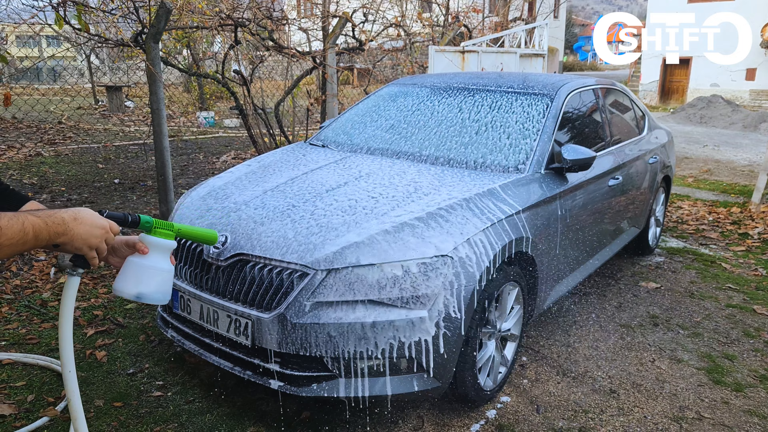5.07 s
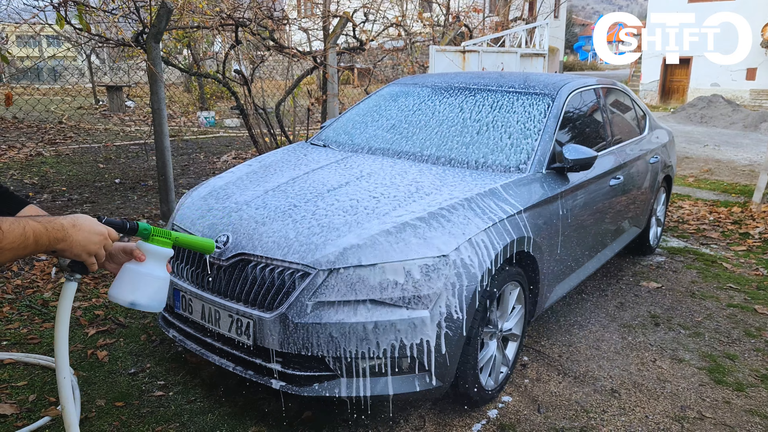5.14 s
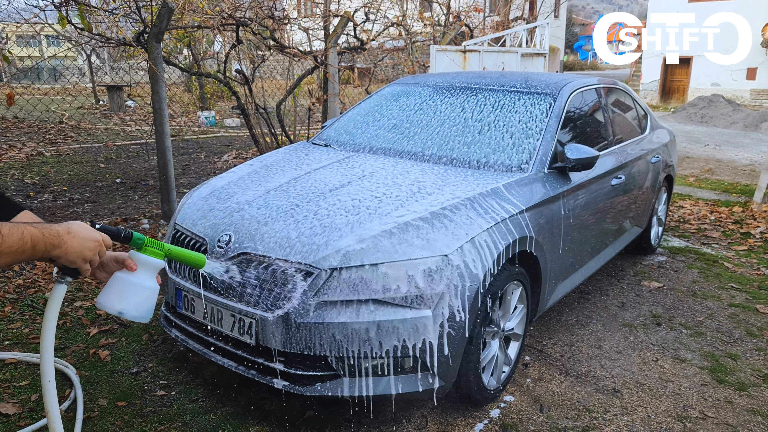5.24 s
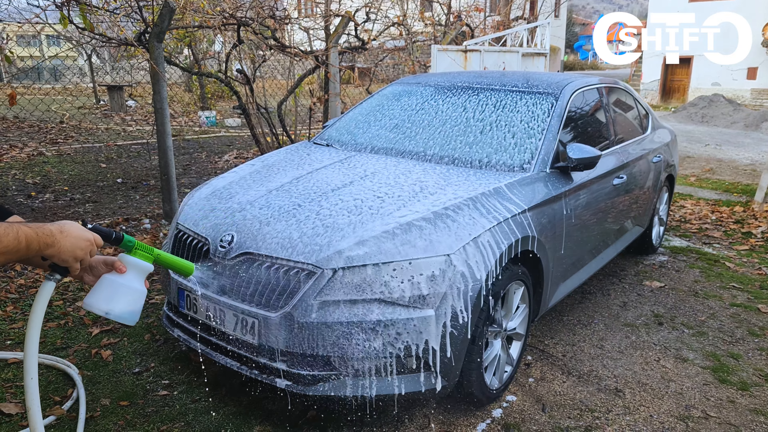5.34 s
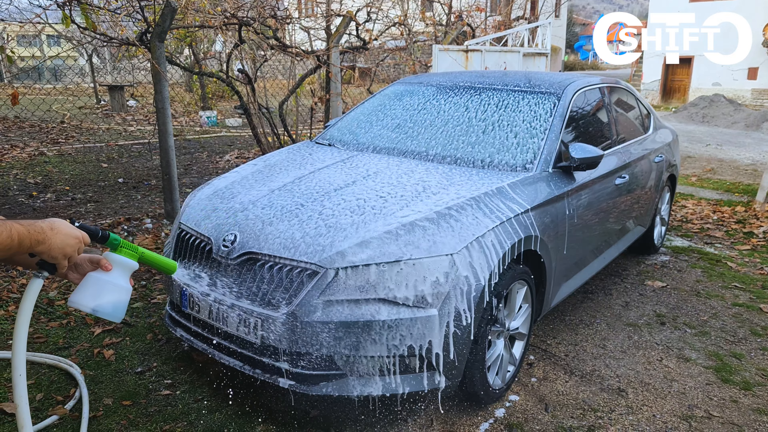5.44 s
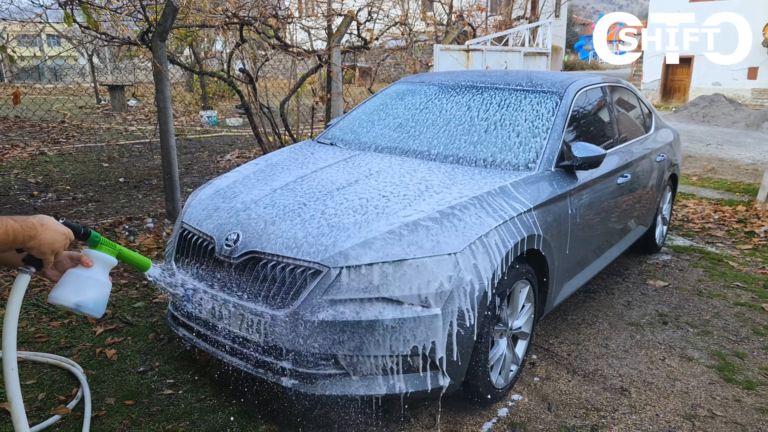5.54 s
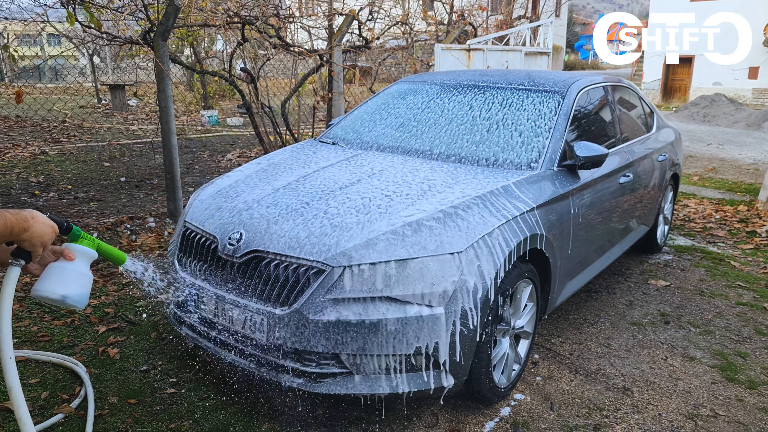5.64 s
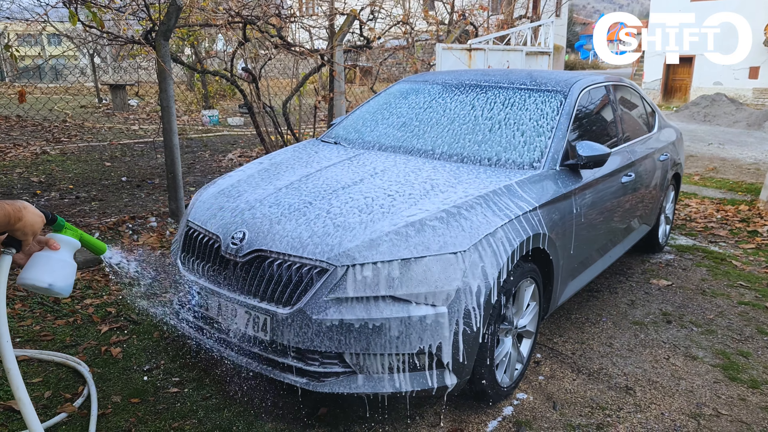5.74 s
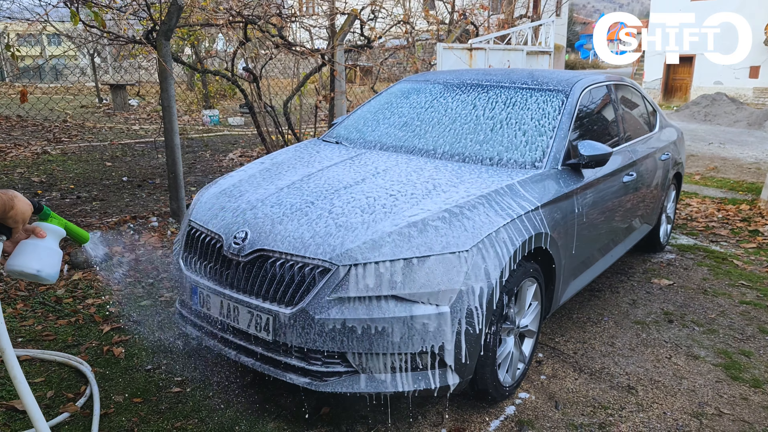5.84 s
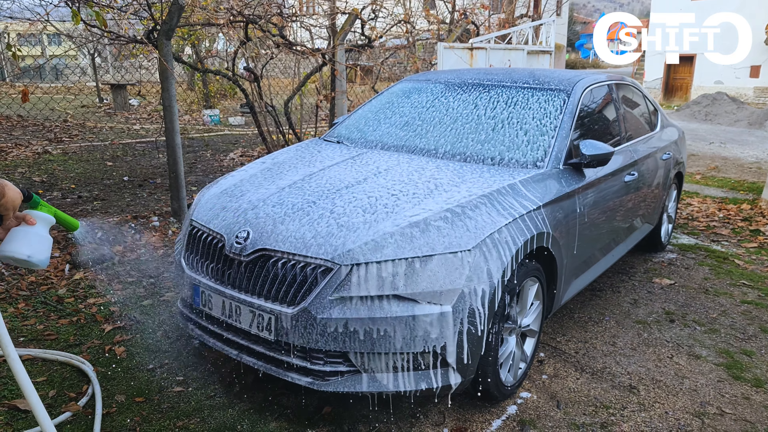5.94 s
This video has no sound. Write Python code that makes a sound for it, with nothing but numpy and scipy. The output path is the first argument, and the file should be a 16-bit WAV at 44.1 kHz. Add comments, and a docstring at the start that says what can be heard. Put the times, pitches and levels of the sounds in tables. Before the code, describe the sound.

Close, steady foam spray starts and stops against a car body outdoors, with faint drips and light wind in the short pauses.

```python
"""The jet of a hose-fed foam gun, band-shaped noise, sprays a car in four bursts close to a stereo microphone.
Resonances ring in the barrel, foam drums on the panels and fizzes; car, fence and walls return echoes.
When the valve shuts, foam in flight patters down as fading noise, and runoff and drops tick as short impulses.
A wandering near-sine whistles faintly; shaped noise makes the light wind and the quiet yard."""
import sys
import numpy as np
from scipy import signal
from scipy.fft import rfft, irfft
from scipy.io import wavfile
from scipy.ndimage import uniform_filter1d

SR = 44100
rng = np.random.default_rng(int(sys.argv[2]) if len(sys.argv) > 2 else 0)


def put_to_file(sound):
    """Save the sound as 16-bit audio at rate SR, in the file named by the first command-line argument."""
    columns = np.atleast_2d(sound).T  # one column per channel
    safe = np.clip(columns, -1, 1)
    whole_steps = np.round(safe * 32767)
    wavfile.write(sys.argv[1], SR, whole_steps.astype(np.int16))


def makeup_ratio(level_db):
    """Linear amplitude ratio for a level in decibels (20 dB per factor of ten)."""
    decades = np.asarray(level_db, float) / 20
    return 10 ** decades


N = 264592  # samples


def evened(x):
    """Normalization: scales to rms 1."""
    return x / np.sqrt(np.mean(x ** 2) + 1e-20)


def banded(x, lo_hz, hi_hz):
    """Parseval's theorem: scales so that the band lo-hi has rms 1."""
    hz = np.fft.rfftfreq(len(x), 1 / SR)
    band_energy = np.sum(abs(rfft(x)[(hz > lo_hz) & (hz < hi_hz)]) ** 2)
    return x * len(x) / np.sqrt(2 * band_energy)


def add(mix, s, sound):
    """Superposition: mixes a sound in at second s."""
    part = mix[round(s * SR):][:len(sound)]
    part += sound[:len(part)]


def read(points, hz):
    """Interpolation of a spectrum on a logarithmic frequency axis."""
    f, value = np.transpose(points)
    return np.interp(np.log(hz + 1), np.log(f + 1), value)


def columns(rows):
    """Linear interpolation: gives the start time and every column at the sample rate."""
    s, *rest = np.transpose(rows)
    t = np.arange(round(s[0] * SR), min(round(s[-1] * SR), N)) / SR
    return s[0], [np.interp(t, s, c) for c in rest]


def hiss(colour, size, patchy_db, flicker_db):
    """Short-time synthesis: random spectra with narrow streaks, wider patches and a fast broadband flicker."""
    hop, hz = size // 4, np.fft.rfftfreq(size, 1 / SR)
    real, imag, streaks, patches, flicker = rng.standard_normal((N // hop + 5, len(hz), 5)).T

    def smoothed(z, bins, frames):
        return evened(uniform_filter1d(uniform_filter1d(z, size=bins, axis=0), size=frames, axis=1))

    streaks = smoothed(streaks, bins=2, frames=44)
    patches = smoothed(patches, bins=12, frames=16)
    flicker = smoothed(flicker, bins=80, frames=3)
    shape_db = read(colour, hz)[:, None] + patchy_db * (streaks + 0.6 * patches) + flicker_db * flicker
    spectra = (real + 1j * imag) * makeup_ratio(shape_db)
    return evened(signal.istft(spectra, nperseg=size, noverlap=size - hop)[1][:N])


def ring(x, hz, width_hz):
    """Heterodyne resonator: shifts the curve hz to zero, smooths with a double pole, shifts back; rms 1."""
    turn = np.exp(2j * np.pi * np.cumsum(hz * np.ones(len(x))) / SR)
    r = np.exp(-np.pi * width_hz / SR)
    smooth = signal.lfilter([1], [1, -2 * r, r ** 2], x / turn)
    return evened((turn * smooth).real)


def whistly(x, hz, width_hz):
    """Superposed resonances: a narrow core stands on wide shoulders."""
    return evened(ring(x, hz, width_hz) + 0.23 * ring(x, hz, 0.23 * width_hz))


def splats(per_s, spread_db):
    """Shot noise: blobs at random instants each raise a gain suddenly, then fade."""
    size_db = abs(spread_db) * np.minimum(rng.exponential(1, N), 4)
    hits = (rng.random(N) < per_s / SR) * makeup_ratio(size_db)
    fade = np.exp(-1 / (0.00079 * SR))  # of the power
    return evened(np.sqrt(signal.lfilter([1], [1, -fade], hits ** 2) + 2.7))


def waver(span_s, count):
    """Low-pass filtered chance: slow curves at rms 1, changing within about span_s."""
    hop = 64
    poles = [np.exp(-hop / (span_s * SR))] * 2
    z = signal.lfilter([1], np.poly(poles), rng.standard_normal((count, N // hop + 200)))[:, 199:]
    return [np.interp(np.arange(N) / hop, np.arange(len(row)), evened(row)) for row in z]


# squeezes of the trigger: valve opens t/s, valve shuts t/s, pressure build-up t/s,
# fizz re jet level/dB, finest mist re fizz level/dB
BURSTS = [(-.5, 0.339, .06, -4, -4), (.846, 2.299, 0.042, -4.5, 0), (3.168, 4.97, 0.064, -4.5, 0),
          (5.31, 6.5, 0.032, -6, -0.5)]
# the gun sweeps across the car: t/s, jet level/dB, low barrel ring re jet level/dB, its pitch f/Hz,
# high barrel ring re jet level/dB, drumming on the panel re jet level/dB
SWEEP = [(0, -38.5, -5, 966, 0, -12.5), (.18, -39.5, -4.5, 908, 0.5, -11), (.26, -40.5, 2, 864, 2.5, -14),
         (.34, -41.5, -2.5, 937, -0.5, -5), (.85, -40, -16.5, 990, -6.5, -15),
         (.93, -38, -6, 972, -3.5, -15.5), (1.03, -38, -2, 976, -9.5, -15),
         (1.25, -39, -2.5, 970, -17, -17), (1.4, -37.5, -3.5, 925, -8.5, -18),
         (1.51, -38, -0.5, 990, 0.5, -12.5), (1.62, -38.5, -5.5, 980, -5, -13),
         (1.86, -42, 3, 1012, -4, -20), (1.98, -40.5, 2.5, 987, -6.5, -18),
         (2.14, -38.5, -1, 915, -17, -16.5), (2.24, -37.5, -5, 920, -9.5, -18),
         (2.3, -40, 4.5, 920, -5, -12), (3.17, -37.5, -1.5, 1064, -12, -22),
         (3.27, -37.5, -9.5, 950, -3, -24), (3.42, -37, -7, 920, -2.5, -13.5), (3.5, -41, 2, 1050, -8, -19),
         (3.64, -40.5, 2, 1012, -12, -27), (3.79, -38, -3.5, 990, -2.5, -17.5),
         (3.97, -35.5, -7, 928, -5.5, -15), (4.15, -35.5, -6.5, 932, -4, -8), (4.35, -36, -10, 941, 0, -12),
         (4.5, -38.5, 0, 1020, 1, -11.5), (4.7, -36.5, -6.5, 970, -7, -9.5),
         (4.82, -37, 2.5, 977, -10.5, -11.5), (4.97, -40, 0.5, 943, -7, -11),
         (5.31, -37, 1.5, 942, -12, -18.5), (5.45, -37.5, -1, 952, -4.5, -16),
         (5.56, -36, -4, 918, -11, -13), (5.69, -36, -6, 935, -2, -22), (5.8, -37, -12.5, 952, -7, -14),
         (6, -42.5, 2.5, 1020, -5, -24)]
# pitch of the high barrel ring: t/s, f/Hz
HIGH_RING = [(0, 2320), (.32, 2410), (.9, 2396), (1.5, 2300), (1.9, 2380), (3.2, 2410), (3.42, 2304),
             (3.8, 2356), (4.34, 2240), (4.5, 2317), (4.9, 2375), (5.7, 2280), (6, 2370)]
# noise spectrum of the jet: f/Hz, level per Hz/dB
JET = [(60, -47.5), (150, -17), (400, -18.5), (650, -5), (790, 0), (1150, -2), (1300, -4.5), (1900, -4),
       (2700, -3), (3200, -1), (4300, -1), (5000, -7.5), (5700, -9.5), (6600, -23.5), (8000, -14),
       (11000, -51)]
# noise spectrum of the fizz: f/Hz, level per Hz/dB
FIZZ = [(3500, -56), (5500, -7), (6800, -8), (7600, -2.5), (8800, -4.5), (10000, -8), (12500, -13),
        (15700, -17.5)]
# resonances of the panel: f/Hz, width f/Hz, level/dB
PANEL = [(177, 40, -6), (271, 52, 6.5), (408.5, 102, 3.5), (494, 230, 11)]


def spray():
    """Source-filter principle: turbulence drives barrel and panel resonances, all gated by the valve."""
    open_s, shut_s = 0.007, 0.006  # travel of the valve
    slack_db = -9  # level at opening, until pressure has built
    lead_in_s, lead_in_db = 0.028, -29.5  # soft noise lead-in before each burst, re jet
    mist_hz, mist_s = 10560, 0.088  # the finest mist, above this pitch, forms as pressure builds
    mid_ring_db, mid_follows = -5.5, 1.02  # the middle ring rises and falls with the low ring
    ring_waver_db, low_waver_db, pitch_waver_hz = 1.8, 1.0, 14
    jet_waver_db, fizz_waver_db = 0.65, 1

    t = np.arange(N) / SR
    grain = splats(per_s=900, spread_db=3.0)
    jet = banded(hiss(JET, size=1024, patchy_db=2.2, flicker_db=0.8) * grain, 2700, 4800)
    fizz = banded(hiss(FIZZ, size=256, patchy_db=1.1, flicker_db=1.1) * grain, 7000, 15000)
    mist = signal.sosfiltfilt(signal.butter(3, mist_hz, "high", fs=SR, output="sos"), fizz)

    s, *rest = np.transpose(SWEEP)
    jet_db, low_db, low_hz, high_db, panel_db = (np.interp(t, s, c) for c in rest)
    (high_hz_waver, high_waver, low_waver, low_hz_waver,
     mid_waver, panel_waver, fizz_waver, jet_waver) = waver(0.03, count=8)
    churn, blows = rng.standard_normal((2, N))  # drive the barrel and the panel

    low_hz = low_hz + pitch_waver_hz * low_hz_waver
    low = makeup_ratio(low_db + low_waver_db * low_waver) * whistly(churn, low_hz, 138)
    mid_db = mid_ring_db + mid_follows * low_db + ring_waver_db * mid_waver
    barrel = makeup_ratio(mid_db) * whistly(churn, 1413, 560)
    high_hz = np.interp(t, *np.transpose(HIGH_RING)) + pitch_waver_hz * high_hz_waver
    high_db = high_db + ring_waver_db * high_waver
    barrel += makeup_ratio(high_db) * whistly(churn, high_hz, 310)
    barrel += makeup_ratio(high_db - 10) * whistly(churn, 3236, 180)  # top ring, along with the high ring

    modes = sum(makeup_ratio(db) * ring(blows, hz, width_hz) for hz, width_hz, db in PANEL)
    panel = makeup_ratio(panel_db + ring_waver_db * panel_waver) * evened(modes)
    jet_wavering = makeup_ratio(jet_waver_db * jet_waver) * jet

    out = np.zeros(N)
    for opens, shuts, build_s, fizz_db, mist_db in BURSTS:
        since = t - opens
        valve = np.clip(since / open_s, 0, 1) ** 2 * np.clip((shuts - t) / shut_s, 0, 1)
        pressure = makeup_ratio(slack_db * np.clip(1 - since / build_s, 0, 1))
        lead_in = makeup_ratio(lead_in_db) * np.clip(1 + since / lead_in_s, 0, 1) * (since < open_s)
        unformed = np.clip(1 - since / mist_s, 0, 1) ** 0.5
        droplets = fizz - mist + makeup_ratio(mist_db) * (1 - unformed) * mist
        fizzing = makeup_ratio(fizz_db + fizz_waver_db * fizz_waver) * droplets
        driven = pressure * (jet_wavering + fizzing + barrel + panel)
        driven += pressure ** 0.47 * low  # the low ring depends less on pressure
        out += valve * driven + lead_in * jet
    return makeup_ratio(jet_db) * out


# reverberation time of the surroundings: f/Hz, t60 t/s
ECHO = [(200, 0.34), (900, 0.4), (1600, .38), (3000, 0.21), (8000, .1)]


def echoes(x):
    """Reverberation by convolution: car, fence and house walls return the spray, the treble dying first."""
    hz, s, z = signal.stft(rng.standard_normal(SR // 2), SR, nperseg=256)
    decay = makeup_ratio(-60 * s / read(ECHO, hz)[:, None])
    tail = signal.istft(z * decay, SR, nperseg=256)[1]
    return makeup_ratio(-24.5) * signal.oaconvolve(x, tail / np.linalg.norm(tail))[:N]


# level of the wind: t/s, level/dB
WIND = [(0, -56), (.25, -60), (.35, -72), (.43, -59.5), (.53, -63), (.61, -56.5), (.67, -71), (.83, -64.5),
        (.95, -57.5), (1.25, -57.5), (1.4, -63), (1.62, -57), (2, -61), (2.35, -60.5), (2.47, -71),
        (2.64, -76.5), (2.71, -65), (2.82, -80), (2.9, -69), (3.06, -68), (3.13, -84), (3.33, -63),
        (3.5, -63), (3.7, -59), (3.9, -63), (4.12, -67), (4.3, -59), (4.9, -63), (5.2, -71), (5.6, -63),
        (6, -65)]
# noise spectrum of the wind: f/Hz, level per Hz/dB
WIND_COLOUR = [(20, -24.5), (34, -5), (47, 7.5), (62, -6), (80, -5.5), (120, -7), (160, -10.5),
               (260, -17.5), (330, -40), (600, -87)]


def wind():
    """Amplitude-modulated low noise: the wind rumbles in lumps on the microphone."""
    s, level_db = np.transpose(WIND)
    gusts = banded(hiss(WIND_COLOUR, size=4096, patchy_db=0.5, flicker_db=0.5), 30, 140)
    lumps_db = 2.5 * waver(0.05, count=1)[0]
    return makeup_ratio(np.interp(np.arange(N) / SR, s, level_db) + lumps_db) * gusts


# noise spectrum of the yard: f/Hz, level per Hz/dB
YARD = [(88, -30), (150, 0), (374, -6.5), (1050, -10), (1400, -11.5), (1540, -14.5), (1950, -18),
        (6890, -16.5), (8530, -13.5), (11000, -18), (15600, -20)]


def yard():
    """Stationary ambient noise: a shaped hiss at a constant mean level."""
    return makeup_ratio(-74.5) * hiss(YARD, size=1024, patchy_db=0.6, flicker_db=0.5)


# after each burst: steady landing t/s, its level/dB, its treble re that level/dB,
# stragglers re that level/dB, runoff from the car level/dB
RELEASES = [(.05, -50.5, -7.5, -5, -89), (.058, -46.5, -4.5, -12, -87), (.06, -48.5, -3, -10, -74)]
# noise spectrum of the patter: f/Hz, level per Hz/dB
PATTER = [(88, -40), (150, -5.5), (326, -5), (420, -5.5), (596, -4), (1840, -8), (1990, -10), (3920, -12.5),
          (9040, -11.5), (15600, -16.5)]


def patter():
    """Two-rate exponential decay: foam in flight lands after the valve shuts, stragglers later."""
    fall, treble_fall, straggle_fall = 450, 699, 127  # dB per s
    treble_straggle_db = -4.5
    rain = hiss(PATTER, size=256, patchy_db=0.8, flicker_db=0.8)
    low = signal.sosfilt(signal.butter(4, 5500, fs=SR, output="sos"), rain)
    high = signal.sosfilt(signal.butter(4, 5500, "high", fs=SR, output="sos"), rain)
    low, high = banded(low, 600, 5000), banded(high, 6000, 14000)
    out = np.zeros(N)
    for (_, shuts, *_), (hold_s, level_db, treble_db, straggle_db, _) in zip(BURSTS, RELEASES):
        t = np.arange(N) / SR - shuts
        late = np.maximum(t - hold_s, 0)
        stragglers = makeup_ratio(straggle_db - straggle_fall * late)
        body = np.hypot(makeup_ratio(-fall * late), stragglers) * low
        treble = np.hypot(makeup_ratio(-treble_fall * late), makeup_ratio(treble_straggle_db) * stragglers) * high
        fade_in = np.clip(1 + t / 0.015, 0, 1)
        out += makeup_ratio(level_db) * fade_in * (body + makeup_ratio(treble_db) * treble)
    return out


def runoff():
    """Filtered shot noise: tiny drips from the car, from the first shutting of the valve onward."""
    size_db = 3 * np.minimum(rng.exponential(1, N), 4)
    ticks = (rng.random(N) < 700 / SR) * makeup_ratio(size_db)  # 700 per s
    t, gain = np.arange(N) / SR, np.zeros(N)
    for (_, shuts, *_), (*_, drip_db) in zip(BURSTS, RELEASES):
        gain[t > shuts] = makeup_ratio(drip_db)
    return gain * ring(ticks * rng.choice([-1., 1.], N), hz=4600, width_hz=5000)


# thin whistles, one list each: t/s, f/Hz
WHISTLES = [
    [(.44, 9250), (.585, 9050), (.63, 8700), (.745, 8350), (.835, 9150), (.85, 9200)],
    [(2.41, 8300), (2.5, 9080), (2.57, 8550), (2.64, 8650), (2.69, 8400), (2.735, 8850), (2.84, 8600),
     (2.92, 8960), (2.98, 8400), (3.015, 8250), (3.03, 8550), (3.08, 8350), (3.13, 8600), (3.17, 8500)],
    [(5.12, 8900), (5.16, 8650), (5.23, 8850), (5.28, 8650), (5.31, 8850)],
]


def whistle():
    """Frequency modulation: a near-sine wanders and wavers a little."""
    out = np.zeros(N)
    for rows in WHISTLES:
        s, (hz,) = columns(rows)
        waver_hz = 12 * evened(uniform_filter1d(rng.standard_normal(len(hz)), size=200))
        tone = np.sqrt(2) * np.sin(2 * np.pi * np.cumsum(hz + waver_hz) / SR)
        add(out, s, makeup_ratio(-85) * tone * signal.windows.tukey(len(hz), 0.1))
    return out


# single drops: t/s, peak level/dB, centre f/Hz
DROPS = [(0.5826, -63, 7930), (2.5451, -61, 4670), (2.6956, -58, 4530), (2.7048, -59.5, 4580),
         (2.7831, -64, 2650), (2.821, -61, 4630), (2.8704, -61, 4170), (2.8963, -58.5, 4590),
         (2.9776, -55.5, 4400), (3.0208, -47, 2890), (3.0304, -62, 4490), (3.0394, -64, 3880),
         (3.0445, -57, 3310), (5.1065, -52, 2300), (5.1314, -53, 5200), (5.1667, -59, 4630),
         (5.171, -52, 4920), (5.203, -59, 4670), (5.2217, -50, 3300), (5.2364, -57, 6860),
         (5.25, -60, 1640)]


def drops():
    """Damped oscillation: each drop is a sharp snap, a tick of a few cycles and a short noisy fade."""
    out, t = np.zeros(N), np.arange(900) / SR
    for (s, peak_db, hz), noise in zip(DROPS, rng.standard_normal((len(DROPS), len(t)))):
        tick = np.sin(2 * np.pi * hz * t) * np.exp(-t / 0.00043) * (1 - np.exp(-t / 0.00017))
        snap = np.sin(2 * np.pi * 1.6 * hz * t) * np.exp(-t / 0.0002)
        fade = ring(noise, hz, 3500) * np.exp(-t / 0.0028)
        drop = tick + 0.44 * snap + 0.15 * fade
        add(out, s, makeup_ratio(peak_db) * drop / abs(drop).max())
    return out


# stereo balance of the leaning sounds: f/Hz, left minus right level/dB
LEAN = [(60, -1), (180, -1), (550, -8.5), (1650, -9.5), (4970, -6), (15000, -8)]


def leaning(x):
    """Interchannel level difference: spreads a sound over both channels, keeping their mean."""
    ratio = np.tanh(read(LEAN, np.fft.rfftfreq(N, 1 / SR)) * np.log(10) / 40)  # side over mid
    side = irfft(rfft(x) * ratio, N)
    return np.array([x + side, x - side])


def scene():
    """Superposition: spray, patter and whistle are mixed equal in both channels; the rest leans right."""
    gun = spray()
    lean_right = leaning(drops() + runoff() + wind() + yard())
    return gun + echoes(gun) + patter() + whistle() + lean_right


def low_pass(x):
    """Removes everything above the highest recorded frequency."""
    return signal.sosfilt(signal.butter(12, 15730, fs=SR, output="sos"), x)


def record(dry):
    """Transducer noise and high-pass response: each capsule adds faint hiss and loses the deepest bass."""
    own = makeup_ratio(-85) * rng.standard_normal((2, N))
    low_cut = signal.butter(3, 38, "high", fs=SR, output="sos")  # Hz
    mix = signal.sosfilt(low_cut, dry + own)
    return low_pass(mix)


dry = scene()
out = record(dry)
put_to_file(out)
```